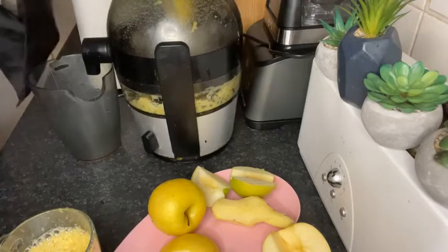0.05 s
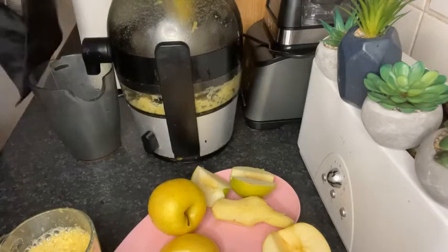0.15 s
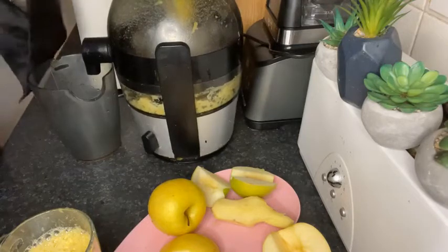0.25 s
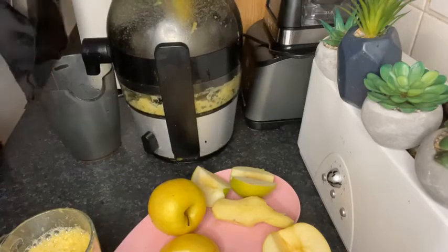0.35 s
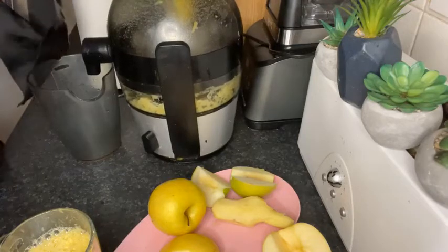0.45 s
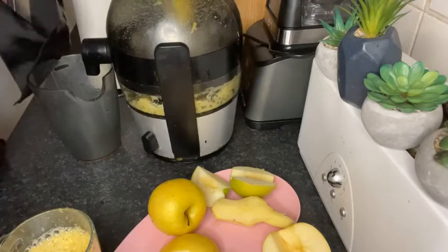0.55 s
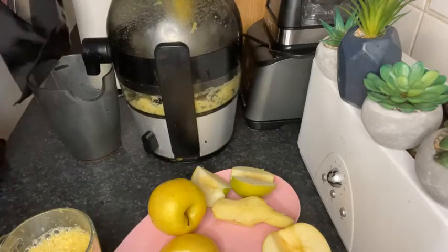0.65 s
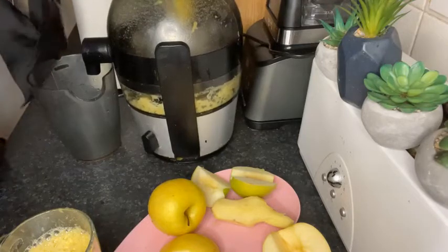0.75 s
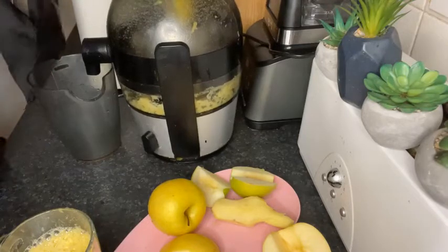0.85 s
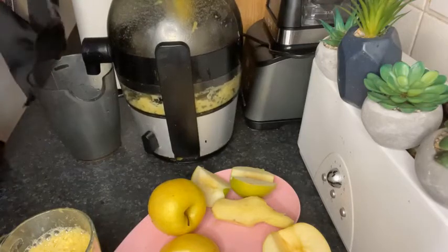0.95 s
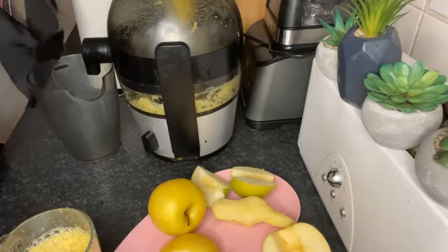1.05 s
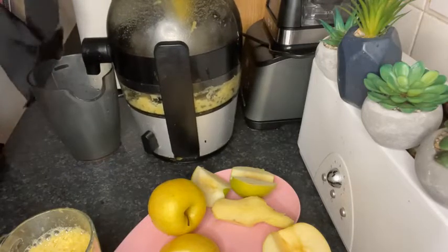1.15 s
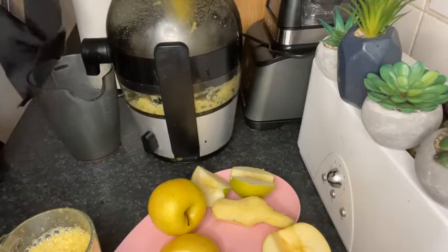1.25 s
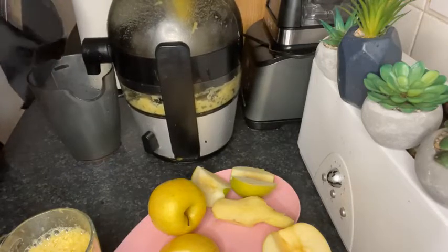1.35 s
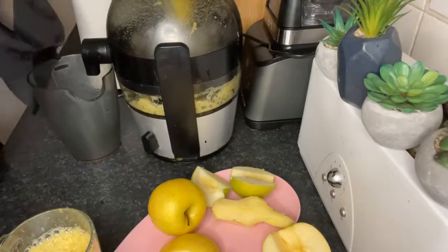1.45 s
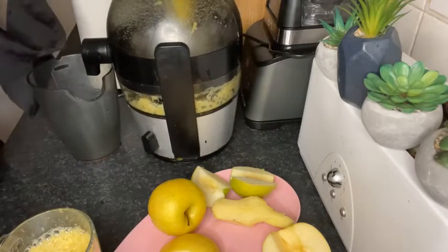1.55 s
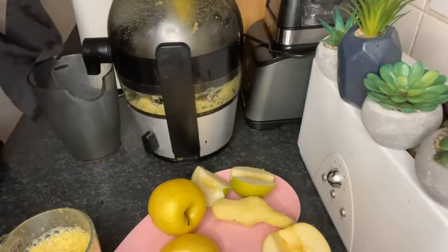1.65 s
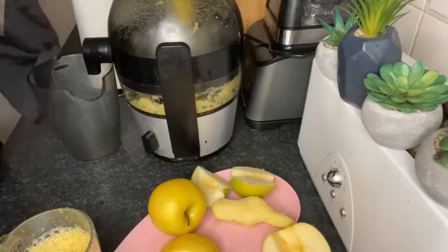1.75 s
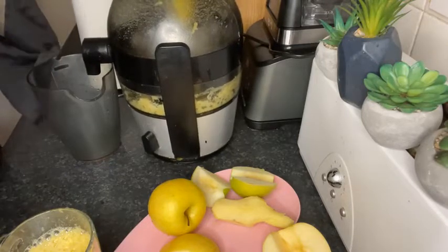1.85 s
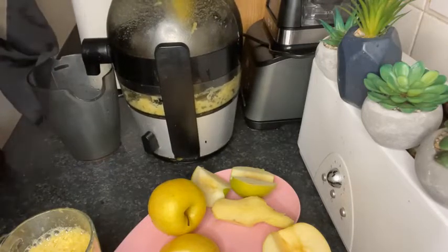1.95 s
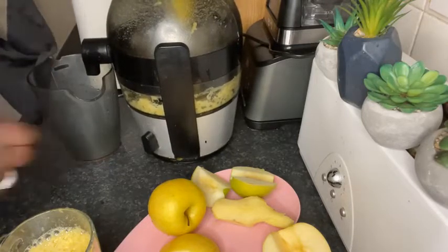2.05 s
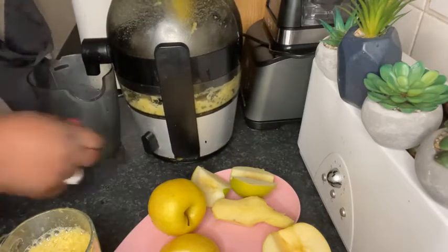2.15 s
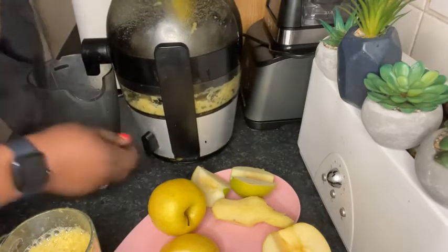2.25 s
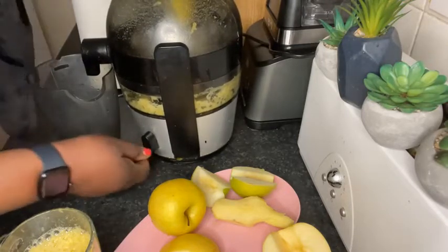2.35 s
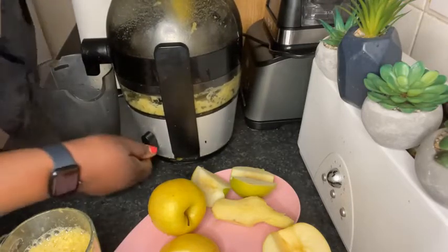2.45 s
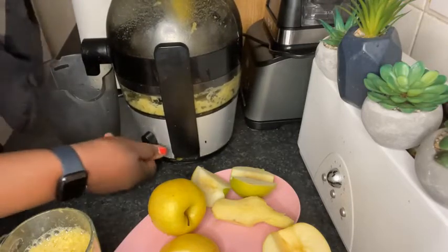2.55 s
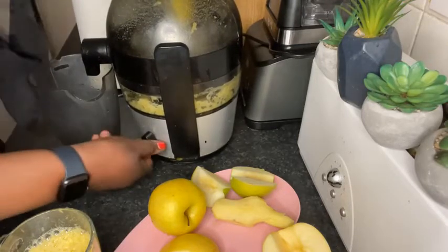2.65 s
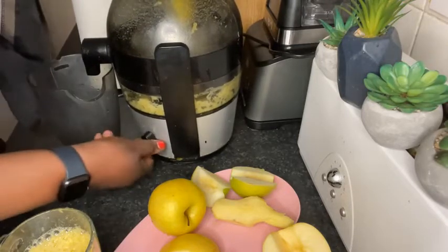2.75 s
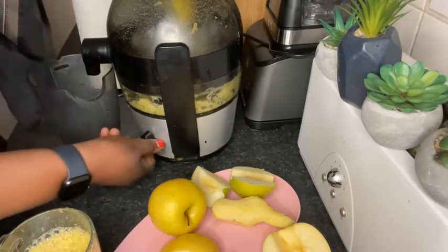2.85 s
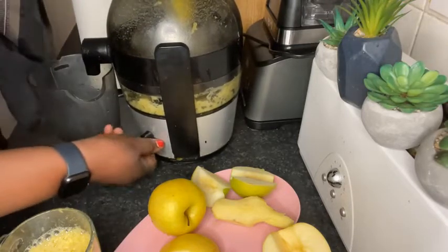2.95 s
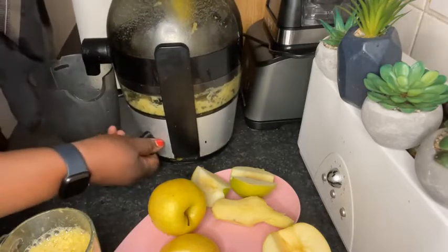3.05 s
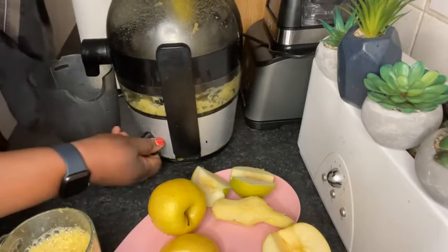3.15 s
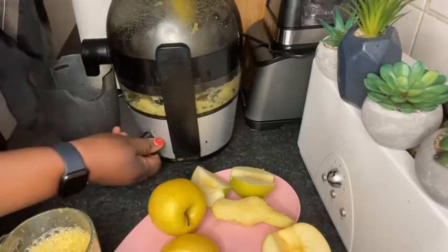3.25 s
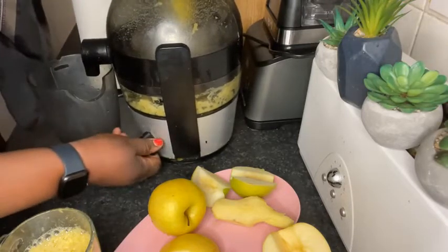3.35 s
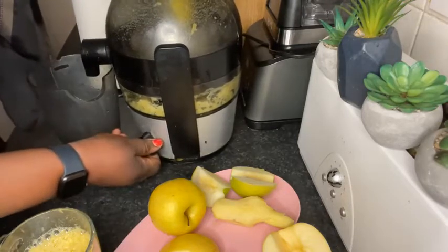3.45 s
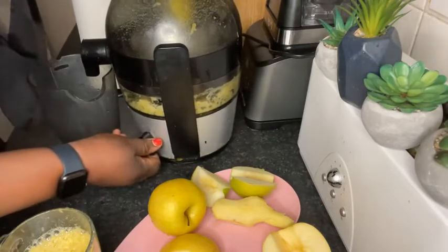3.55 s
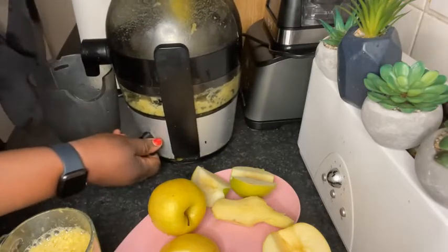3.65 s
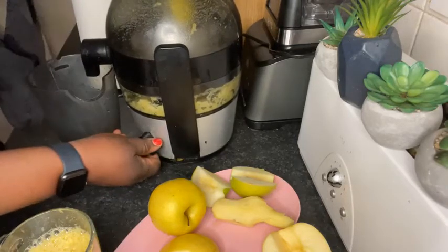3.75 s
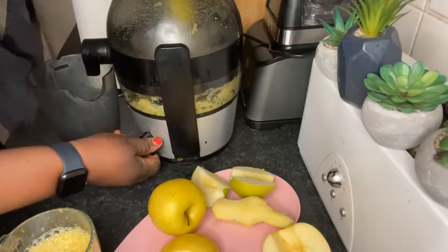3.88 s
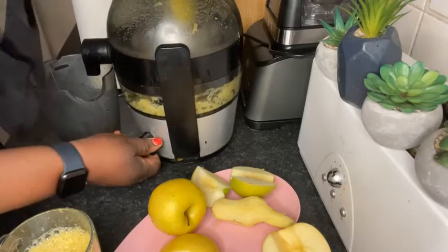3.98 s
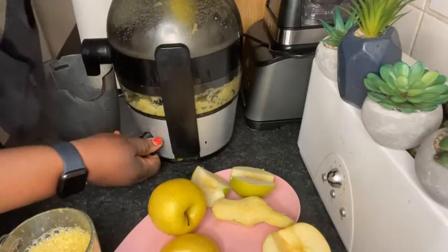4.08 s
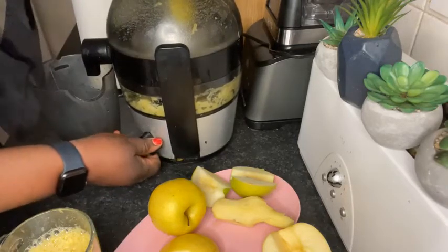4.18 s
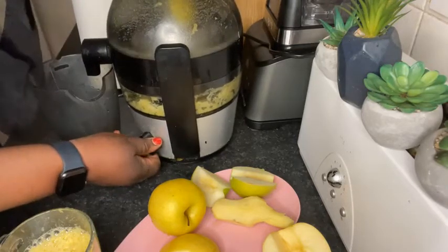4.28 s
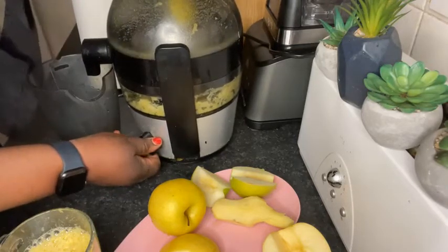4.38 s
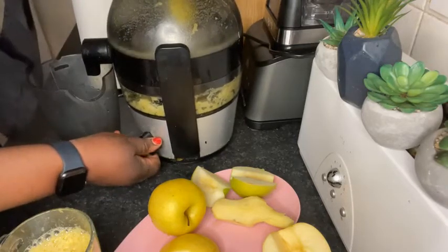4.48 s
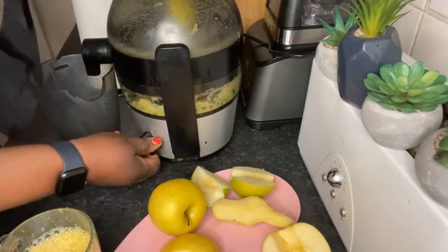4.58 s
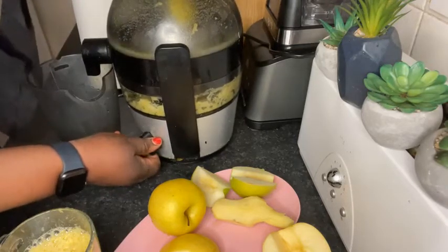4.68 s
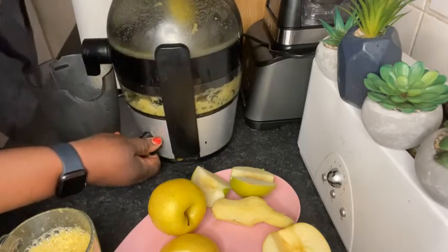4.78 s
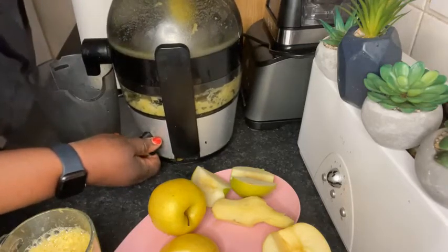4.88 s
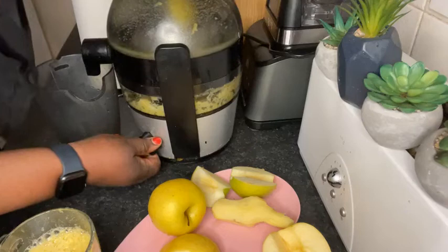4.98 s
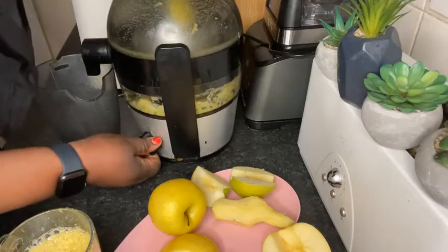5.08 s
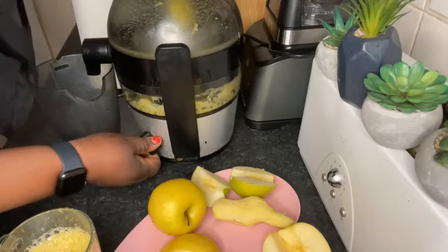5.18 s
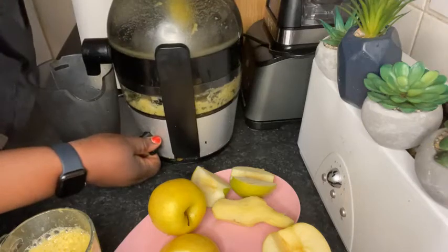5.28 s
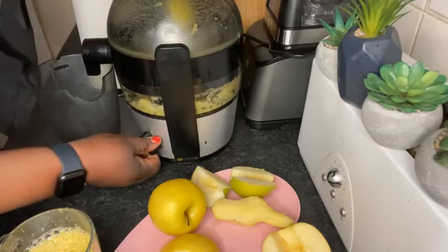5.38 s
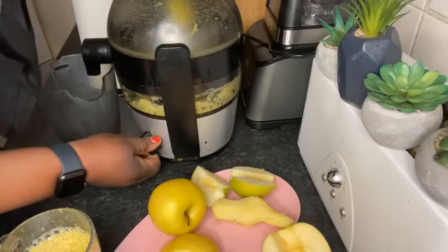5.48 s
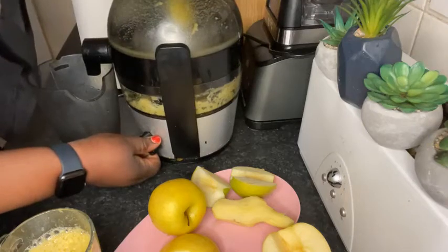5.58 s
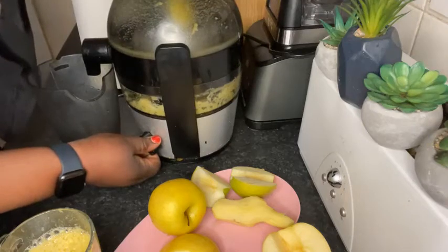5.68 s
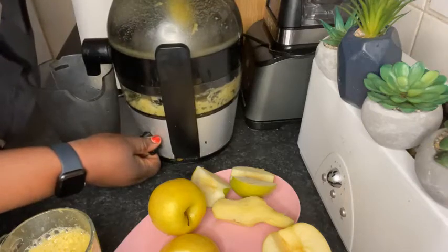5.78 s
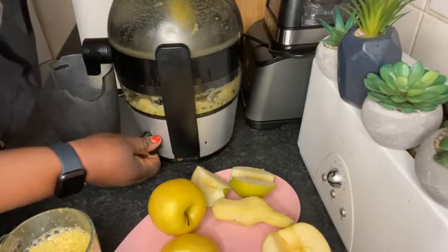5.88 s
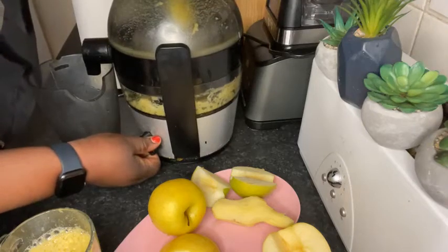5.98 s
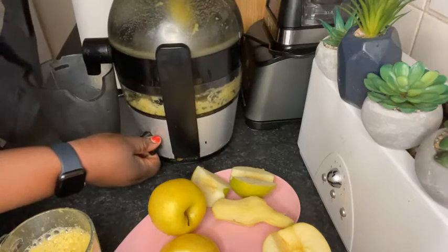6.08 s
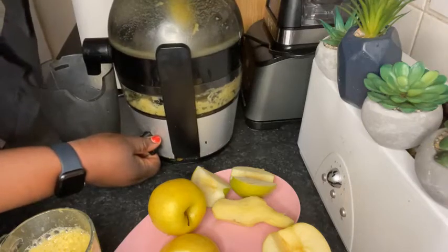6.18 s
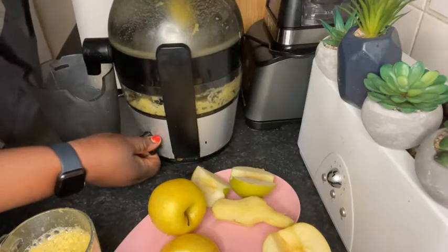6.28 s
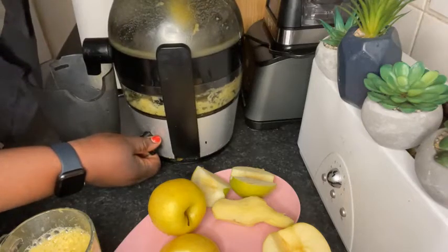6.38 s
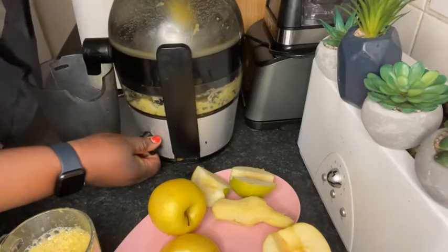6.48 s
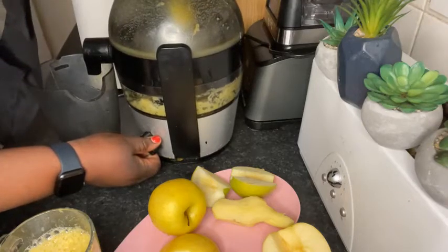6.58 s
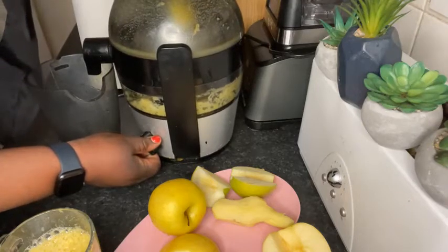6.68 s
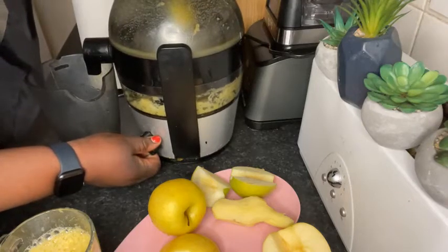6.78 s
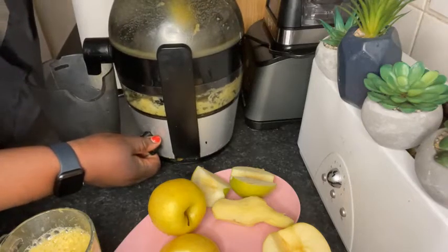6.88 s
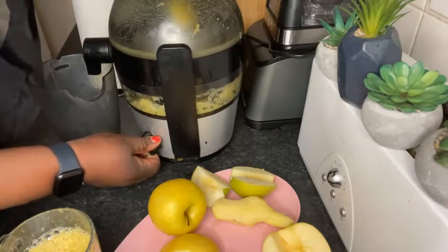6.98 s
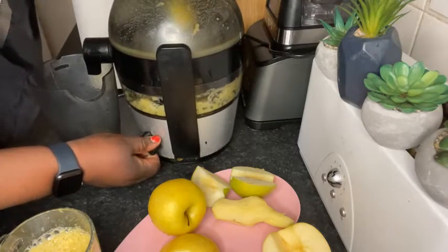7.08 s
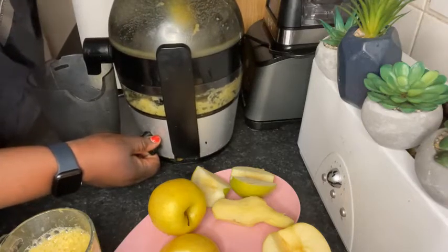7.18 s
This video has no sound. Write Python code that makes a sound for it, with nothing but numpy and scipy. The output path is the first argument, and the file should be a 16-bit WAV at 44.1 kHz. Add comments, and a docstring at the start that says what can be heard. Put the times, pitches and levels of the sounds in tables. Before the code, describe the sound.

Close in a tiled kitchen, a plastic jug is knocked into place with hollow clacks and dull thuds while a sleeve rustles. After a near-quiet pause with tiny ticks, a switch snaps sharply. A juicer shudders with dull basket knocks, sweeps quickly up in pitch and settles into a loud hum, whine and airy hiss that runs to the end.

```python
"""A tiled kitchen, one microphone close to a centrifugal juicer on the worktop.
A plastic jug is knocked into place under the spout, a sleeve rustles and the switch clicks on.
The motor runs up: the unbalanced basket hums, bearings and commutator whine, air rushes through the sieve.
Tones follow the shaft angle; rattle, air, cloth and clicks are filtered noise; the jug rings in decaying modes.
"""
import sys
import numpy as np
from scipy import signal
from scipy.fft import rfft, irfft
from scipy.io import wavfile
from scipy.ndimage import uniform_filter1d

SR = 44100
rng = np.random.default_rng(int(sys.argv[2]) if len(sys.argv) > 2 else 0)


def unload_wav(signal):
    """Save mono or channel-first audio to the path in sys.argv[1] as 16-bit WAV at rate SR, clipped to [-1, 1]."""
    wavfile.write(
        sys.argv[1],
        SR,
        np.round(np.clip(np.atleast_2d(signal).T, -1, 1) * 32767).astype(np.int16),
    )


N = 318843  # length in samples

# power comes on and the running noise climbs to its full level
POWER_S, CLIMB_S, CLIMB_DB = 3.255, 0.21, 23


def juicer():
    """The motor runs up; every tone and the grain of the noise follow its shaft."""
    speed = shaft_speed()
    turns = np.cumsum(speed) / SR
    pace = speed / HELD_HZ
    running = since(POWER_S)
    on = np.minimum(running / 0.012, 1)
    climb_db = -CLIMB_DB * np.maximum(1 - running / CLIMB_S, 0)
    tonal = hum(turns, speed, pace) + whirl(turns) + whine(turns, pace) + whistle(turns, speed, pace)
    rough = bearing(turns, pace) + rattle(turns, running, climb_db) + air(turns, climb_db)
    shaking = undb(-31.5) * worktop()
    return on * (tonal + rough + shaking)


# the shaft starts to turn, heads for its free speed and is held just below it (Hz: turns per second)
START_S, FREE_HZ, HELD_HZ = 3.267, 179.23, 177
# the run-up has a quick and a slow part (share of the quick part, two time constants)
QUICK_SHARE, QUICK_S, SLOW_S = .556, .2198, .7433


def shaft_speed():
    """Turns per second: the motor gains speed fast, then ever more slowly, until it is held."""
    t = since(START_S)
    quick = QUICK_SHARE * np.exp(-t / QUICK_S)
    slow = (1 - QUICK_SHARE) * np.exp(-t / SLOW_S)
    return np.minimum(FREE_HZ * (1 - quick - slow), HELD_HZ)


# resonances of the juicer on the worktop that the hum climbs through: centre_hz, width_hz, lift_db
MOUNT_RESONANCES = [(115.3, 15.5, 12.5), (146.5, 21, 4)]


def hum(turns, speed, pace):
    """The force of the unbalanced basket grows with the square of the speed."""
    tone = np.sqrt(2) * np.sin(2 * np.pi * turns) * pace ** 2
    # level at held speed, before the mount lifts it
    return tone * lift(speed, MOUNT_RESONANCES) * undb(-17 + 0.16 * walk(14))


# every spell of whirl or singing swells and dies away alike
ATTACK_S, RELEASE_S = 0.068, .12


def whirl(turns):
    """One spell of a tone just under half the shaft speed."""
    tone = tones(turns, [(.485, -41)], flutter_db=1.0, smear=.6, rate=14)
    return tone * spell(4.28, 0.52, ATTACK_S, RELEASE_S)


# tones of shaft and fan; broken multiples come from the ball bearings: shaft_multiple, level_db
SHAFT_TONES = [(1.59, -37), (2, -29.5), (2.6, -38.5), (3, -36), (3.21, -49), (3.4, -43.5), (3.6, -40.5),
               (3.95, -43), (4.61, -49), (6, -43.5), (6.16, -38.5), (6.6, -48), (7, -43.5), (7.82, -46),
               (10, -43.5), (12.57, -51.5), (18.24, -51.5), (25, -48.5), (26.06, -53), (28.3, -51),
               (31.8, -48), (48, -48)]
# resonances of the housing that lift a passing tone: centre_hz, width_hz, added_db
HOUSING_RESONANCES = [(1747, 60, 7.5), (3160, 130, 7.5)]


def whine(turns, pace):
    """Shaft, fan and bearing tones, which stand out fully only near top speed."""
    lines = tones(turns, SHAFT_TONES, flutter_db=1.26, smear=0.37, rate=14)
    return resonate(lines, HOUSING_RESONANCES) * (0.35 * pace + 0.7 * pace ** 18)


# resonances of the motor casing that the whistle climbs through: centre_hz, width_hz, lift_db
CASING_RESONANCES = [(3880, 220, 17), (6060, 70, 4), (6340, 80, 11.5)]


def whistle(turns, speed, pace):
    """The bars of the commutator pass the brushes and whistle through the casing."""
    bars = 36
    # level at held speed, before the casing lifts it
    tone = tones(turns, [(bars, -47)], flutter_db=2.5, smear=0.46, rate=45)
    return tone * pace * lift(bars * speed, CASING_RESONANCES)


# tones of the singing bearing: shaft_multiple, relative_db
BEARING_TONES = [(11.56, -7), (12, -9.5), (12.56, -2.5), (13, -6.5), (13.56, -3.5), (14, -18)]
# spells in which the bearing sings; they may overlap:
# start_s, length_s, upper_resonance_db, lower_resonance_db
SINGING_SPELLS = [(4.267, .2, -31, -55), (4.4, .82, -27, -52), (4.74, 0.19, -40, -31),
                  (4.95, 0.1, -26, -42), (5.14, 0.26, -40, -35.5), (5.45, .87, -29, -48),
                  (5.48, .35, -40, -38)]
# between spells the bearing sings faintly (level at top speed)
FAINT_SING_DB = -37.5


def bearing(turns, pace):
    """The balls add tones and grit, which sing in spells in two resonances of the body."""
    grit = repeating(turns, memory=0.29, count=7)
    balls = tones(turns, BEARING_TONES, flutter_db=3.0, smear=0.98, rate=30) * pace ** 6 + 4 * grit
    upper_power, lower_power = sum(
        np.outer(undb(dbs), spell(start, length, ATTACK_S, RELEASE_S)) ** 2
        for start, length, *dbs in SINGING_SPELLS)
    faint = undb(FAINT_SING_DB) * pace ** 6
    upper = unit(band(band(balls, 2180, 173), 2090, 650)) * np.sqrt(upper_power + faint ** 2)
    lower = unit(band(band(grit, 1840, 150), 1900, 260)) * np.sqrt(lower_power)
    return upper + lower


# colour of the body rattle: frequency_hz, relative_db (per Hz)
RATTLE_COLOUR = [(40, -55), (130, -33), (220, 2), (310, -3), (420, 2.5), (620, 1.5), (900, -5), (1150, -1),
                 (1500, -12), (1850, -7.5), (2250, -6), (2700, -20.5), (4500, -15.5), (9000, -24.5)]
# the rattle eases as the pulp spreads out in the basket
RATTLE_DB, SETTLE_DB_PER_S = -26, 1.26


def rattle(turns, running, climb_db):
    """The body rattles with the rotor's roughness; the ball cage makes two laps in five turns."""
    body = unit(colour(repeating(turns, memory=0.49, count=5), RATTLE_COLOUR))
    return body * undb(RATTLE_DB + climb_db - SETTLE_DB_PER_S * running + 0.3 * walk(30))


# colour of the rush of air: frequency_hz, relative_db (per Hz)
AIR_COLOUR = [(500, -21), (1500, -3), (2750, -6), (3600, -0.5), (4150, -0.5), (5700, 0), (7100, -4),
              (8900, -3.5), (10000, -0.5), (10200, -9), (11500, -14), (13000, -27), (16000, -32)]
# resonances of lid and pulp bowl: centre_hz, width_hz, added_db
LID_RESONANCES = [(3260, 174, 13), (4350, 75, 3)]
# the rush of air swells once, around its crest
AIR_DB, SURGE_S, SURGE_WIDTH_S, SURGE_DB = -26.5, 5.2, 1, 2


def air(turns, climb_db):
    """Air and brush hiss pulse once a turn, echo from the tiles and ring lid and bowl."""
    hiss = noise() + 0.83 * repeating(turns, memory=0.48, count=5)
    hiss = hiss * (1 + 0.12 * np.sin(2 * np.pi * turns))
    rush = unit(resonate(colour(tiles(hiss, t60=0.1, wet_db=-7.5), AIR_COLOUR), LID_RESONANCES))
    surge_db = SURGE_DB * np.exp(-((since(0) - SURGE_S) / SURGE_WIDTH_S) ** 2)
    return rush * undb(AIR_DB + climb_db + surge_db + 0.55 * walk(40))


# the basket jolts as it starts and passes its slow wobble: start_s, knock_db, pitch_hz, thud_db
BASKET_JOLTS = [(3.265, -34, 390, -25), (3.304, -34, 370, -22), (3.383, -32, 685, -21),
                (3.408, -32, 640, -20), (3.447, -22.5, 537, -17), (3.474, -20, 463, -25),
                (3.488, -20.5, 406, -33)]


def jolts():
    """Short dull knocks of the basket on its coupling; each also shakes the worktop."""
    knocks, shaking_power = 0, 0
    for start, db, hz, thud_db in BASKET_JOLTS:
        t = since(start)
        knocks = knocks + undb(db) * fade(t, 0.19) * unit(band(band(noise(), hz, 150), hz, 400))
        shaking_power = shaking_power + (undb(thud_db) * np.minimum(t / 0.0072, 1) * fade(t, 0.52)) ** 2
    return knocks + np.sqrt(shaking_power) * worktop()


def worktop():
    """Low rumble of the shaken worktop, rms 1."""
    return unit(band(band(noise(), 124.8, 23.5), 144, 62))


# the jug against juicer and worktop: start_s, clack_db, thud_db, contact_pitch_hz (levels before filters)
JUG_KNOCKS = [(0.041, -40, -51, 1390), (0.169, -36.5, -22.5, 330), (.393, -31.5, -37, 880),
              (.447, -27.5, -33, 780), (.462, -39, -44, 2200), (.476, -27, -22, 900), (.51, -33, -46, 1700),
              (.558, -22.5, -49, 1930), (1.021, -38.5, -42.5, 890), (1.234, -17, -35.5, 1100),
              (1.41, -42, -56, 496), (1.592, -41, -60, 500), (2.065, -45, -68, 700)]
# colour of a plastic clack: frequency_hz, relative_db (per Hz)
CLACK_COLOUR = [(60, 12.5), (200, 13), (420, 8), (600, -1.5), (900, 8), (1350, -4), (1850, 1.5),
                (3200, -2.5), (5000, -2.5), (10000, -6.5), (12000, -14.5), (16000, -12.5)]


def jug():
    """The jug is nudged into place under the spout; each contact gives a clack and a thud."""
    out, t = np.zeros((2, N)), np.arange(SR) / SR
    for start, *blow in JUG_KNOCKS:
        at = int(start * SR)
        out[:, at:at + SR] += knock(t, *blow)
    clacks, thuds = out
    return colour(clacks, CLACK_COLOUR) + thuds


# ring of the jug: pitch_hz, relative_db, t60_s
JUG_MODES = [(232.6, 0, 0.1), (357, -10, .15), (422, -7, 0.27), (640, -5.5, 0.15), (811, -5, 0.15),
             (945, -9.5, 0.14), (1028, 1.5, 0.24), (1170, -3.5, 0.31), (1760, 3, 0.17), (1840, 1, 0.19),
             (2260, -13.5, 0.18), (2680, 0, .2), (2970, 0, 0.23), (3350, 1.5, .24)]


def knock(t, clack_db, thud_db, hz):
    """The point of contact colours clack and ring; the worktop answers with a slower thud."""
    burst = rng.standard_normal(len(t)) * (fade(t, 0.065) + 0.47 * fade(t, 0.41))
    ring = sum(
        undb(db + 2 * rng.standard_normal()) * fade(t, t60) * np.sin(2 * np.pi * (f * t + rng.random()))
        for f, db, t60 in JUG_MODES)
    clack = (undb(-5.5) * burst + undb(-21) * ring) * np.minimum(t / 0.0021, 1)
    clack = band(clack, hz, 3.64 * hz) + 0.28 * band(clack, hz, hz / 4)
    swell = (t / .027) ** 3 * np.exp(3 * (1 - t / .027))  # crest at 27 ms
    boards = unit(band(band(rng.standard_normal(len(t)), 205, 150), 200, 300)) * fade(t, 0.17)
    thud = (swell + 0.08 * fade(t, 0.83)) * np.sin(2 * np.pi * 123 * t) + 0.24 * boards
    return np.array([undb(clack_db) * clack, undb(thud_db) * thud])


# the hand ticks and squeaks on its way to the knob, then snaps it round:
# start_s, relative_db, pitch_hz, width_hz, contact_s (time constant)
KNOB_CLICKS = [(2.203, -46.5, 7700, 2040, 0.005), (2.304, -54, 8400, 1500, .004),
               (2.345, -59, 3430, 300, 0.033), (2.365, -56, 5000, 300, .03),
               (2.548, -48.5, 6640, 1100, .005), (2.626, -35, 2280, 2560, 0.005),
               (2.629, -42.5, 620, 800, 0.026), (2.784, -61, 740, 418, 0.0045),
               (2.982, -64, 6000, 9000, 0.066), (3.115, -58, 8000, 6040, .012),
               (3.239, -15, 7160, 7700, 0.0046), (3.24, -31, 800, 1110, 0.011)]
# resonances of the front panel around the knob: centre_hz, width_hz, added_db
PANEL_RESONANCES = [(900, 110, 7), (1710, 110, 11), (2310, 100, 8), (2520, 110, -9), (3100, 210, -4)]


def switch():
    """Short snaps of the knob ring the front panel, each with the tail of the tiled kitchen."""
    out = 0
    for start, db, hz, width, contact in KNOB_CLICKS:
        t = since(start)
        grain = unit(band(band(noise(), hz, width), hz, 2 * width))
        envelope = np.minimum(t / 0.0029, 1) * (np.exp(-t / contact) + 0.3 * fade(t, 0.41))
        out = out + undb(db - 5.5) * grain * envelope
    return resonate(out, PANEL_RESONANCES)


# colour of the cloth: frequency_hz, relative_db (per Hz)
CLOTH_COLOUR = [(100, -8), (250, -7), (500, -7), (1200, -5.5), (2330, -2.5), (3000, -3), (7000, -2.5),
                (9800, -3), (11200, -10), (11700, -14.5), (16000, -10)]
# strokes of the sleeve: start_s, rise_s, relative_db, decay_s (time constant)
SLEEVE_STROKES = [(0, 0.026, -56.5, 0.4), (.16, 0.062, -50.5, 0.29), (.38, 0.076, -52, 0.39),
                  (.76, .08, -44.5, 0.17), (.92, 0.17, -43.5, 0.3), (1.41, 0.092, -47, 0.23),
                  (2.2, 0.16, -62.5, 0.096), (2.6, 0.061, -64, 0.096), (3.1, 0.16, -61, 0.061)]


def sleeve():
    """Cloth slides on cloth in strokes of many tiny slips; slow sliding is duller."""
    slips = colour(unit(noise() * undb(1.1 * walk(600))), CLOTH_COLOUR)
    effort = np.sqrt(sum(
        (undb(db) * spell(start, rise, rise, decay)) ** 2 for start, rise, db, decay in SLEEVE_STROKES))
    dull = signal.sosfilt(signal.butter(8, 10800, fs=SR, output="sos"), slips)
    treble = signal.sosfilt(signal.butter(8, 10800, "high", fs=SR, output="sos"), slips)
    brightness = np.minimum(effort / undb(-55), 1)
    return (dull + brightness * treble) * effort * undb(3.5 + 1.0 * walk(40.7))


# the quiet kitchen: frequency_hz, relative_db (per Hz)
ROOM_COLOUR = [(20, -24), (40, -26.5), (100, -4), (150, -7), (230, -15.5), (400, -15.5), (560, -16),
               (1250, -23.5), (2400, -25.5), (3200, -34), (9000, -72), (16000, -55)]
ROOM_DB, APPLIANCE_HZ = -62, 339.6


def kitchen():
    """Quiet room noise and the faint steady tone of an appliance."""
    tone = np.sin(2 * np.pi * APPLIANCE_HZ * since(0) + .2 * walk(5))
    appliance = tone * undb(-62.5 + 0.8 * walk(6.0))
    return colour(noise(), ROOM_COLOUR) * undb(ROOM_DB) + appliance


def tiles(x, t60, wet_db):
    """Dense echoes from tiles and worktop give a fixed fine ripple to the spectrum."""
    t = since(.001)[:SR // 3]
    echoes = rng.standard_normal(len(t)) * fade(t, t60)
    return x + undb(wet_db) * signal.fftconvolve(x, echoes / np.linalg.norm(echoes))[:N]


def tones(turns, table, flutter_db, smear, rate):
    """Lines locked to the shaft angle, each wavering in level and phase (smear in radians)."""
    out = 0
    for multiple, db in table:
        level = np.sqrt(2) * undb(db + flutter_db * walk(rate))
        out = out + level * np.sin(2 * np.pi * (multiple * turns + rng.random()) + smear * walk(rate))
    return out


def repeating(turns, memory, count):
    """Roughness fixed to the rotor: it comes back every count turns and is slowly renewed."""
    size = 512 * count  # grains in one lap
    place = turns / count * size
    laps = rng.standard_normal((int(place[-1] / size) + 30, size))
    # each lap keeps a share of the one before; the first 20 only settle the filter
    laps = signal.lfilter([1], [1, -np.clip(memory, 0, .95)], laps, axis=0)[20:]
    return unit(np.interp(place, np.arange(laps.size), laps.ravel()))


def spell(start, length, rise, decay):
    """Envelope that rises, holds until its length is over and dies away."""
    return np.minimum(since(start) / rise, 1) * np.exp(-since(start + length) / decay)


def lift(hz, modes):
    """Gain of a gliding tone as it passes through resonances."""
    return np.sqrt(1 + sum(
        undb(db) ** 2 / (1 + (2 * (hz - centre) / width) ** 2) for centre, width, db in modes))


def band(x, hz, width):
    """One resonance, gain 1 at its centre."""
    return signal.lfilter(*signal.iirpeak(hz, hz / min(width, SR / 3), fs=SR), x)


def resonate(x, modes):
    """A sound plus the resonances that it excites."""
    return x + sum(undb(db) * band(x, hz, width) for hz, width, db in modes)


def colour(x, points):
    """Causal minimum-phase filter with the given (Hz, dB) shape; white noise keeps its level."""
    hz, db = np.transpose(points)
    size = 2 ** 19
    grid_hz = np.arange(size // 2 + 1) * SR / size
    gain = unit(undb(np.interp(np.log(grid_hz + 1), np.log(hz), db)))
    # folding the cepstrum makes the filter causal
    cepstrum = irfft(np.log(gain))[:size // 2]
    cepstrum[0] /= 2
    return irfft(rfft(x, size) * np.exp(rfft(2 * cepstrum, size)))[:N]


def walk(rate):
    """Smooth chance with a spread near 1, rate new values a second."""
    k = int(SR / rate)
    steps = np.repeat(rng.standard_normal(N // k + 1), k)
    return uniform_filter1d(steps, k)[:N] * np.sqrt(3 / 2)


def noise():
    """White noise, rms 1."""
    return rng.standard_normal(N)


def since(start):
    """Seconds since a moment, zero before it."""
    return np.maximum(np.arange(N) / SR - start, 0)


def fade(t, t60):
    """Exponential decay by 60 dB in t60 seconds that starts when t leaves zero."""
    return (t > 0) * np.exp(-np.log(1000) * t / t60)


def undb(db):
    """Decibels to gain."""
    return 10 ** (np.asarray(db) / 20)


def unit(x):
    """Scale to rms 1."""
    return x / np.sqrt(np.mean(x ** 2))


def scene():
    """All sources reach one microphone, the same in both channels."""
    mono = juicer() + jolts() + jug() + switch() + sleeve() + kitchen()
    return np.array([mono, mono])


def record(dry):
    """The recorder thins the deepest bass and cuts the top."""
    thin = signal.sosfilt(signal.butter(2, 45, "high", fs=SR, output="sos"), dry)
    return signal.sosfilt(signal.ellip(10, .2, 80, 15800, fs=SR, output="sos"), thin)


dry = scene()
out = record(dry)
unload_wav(out)
```